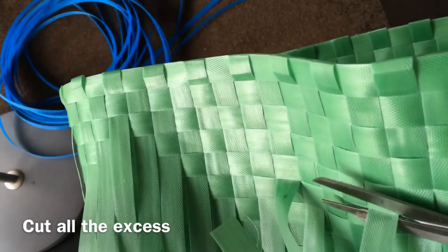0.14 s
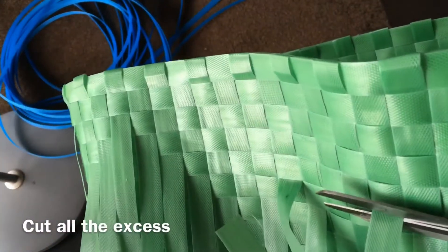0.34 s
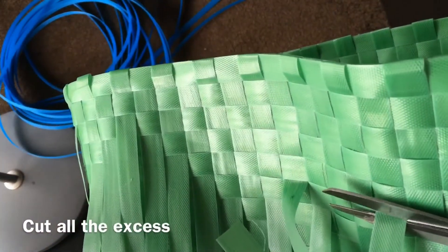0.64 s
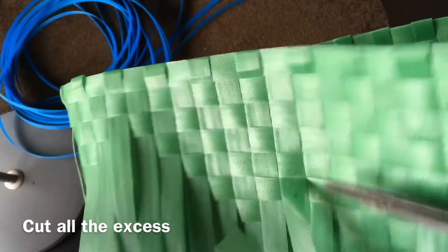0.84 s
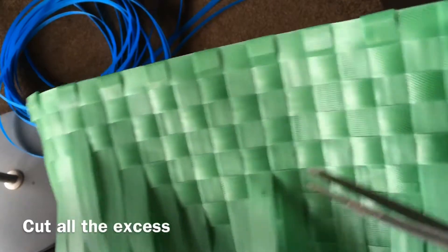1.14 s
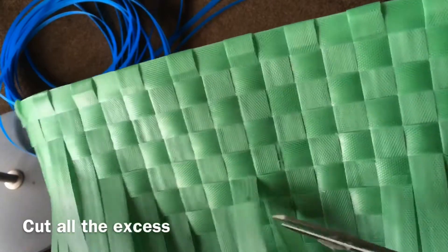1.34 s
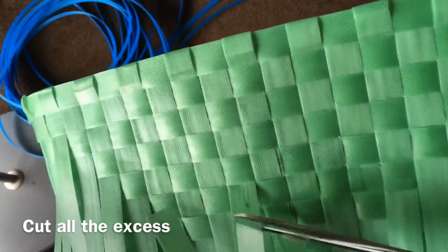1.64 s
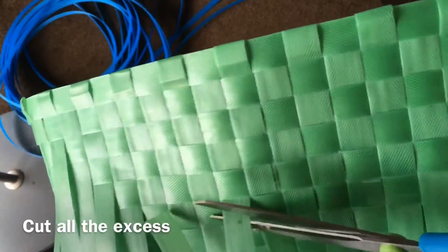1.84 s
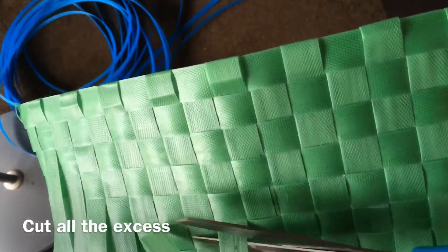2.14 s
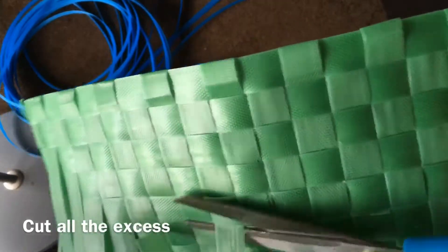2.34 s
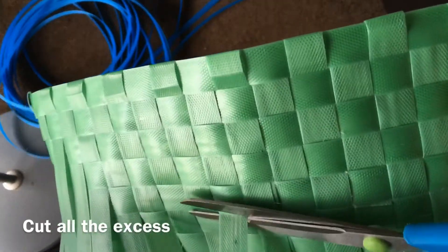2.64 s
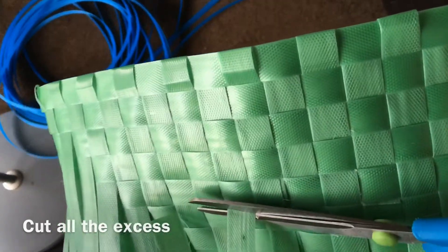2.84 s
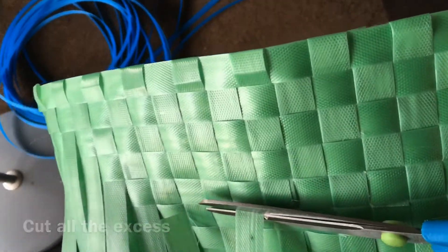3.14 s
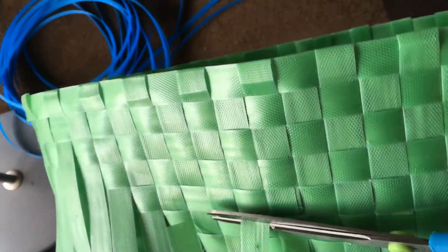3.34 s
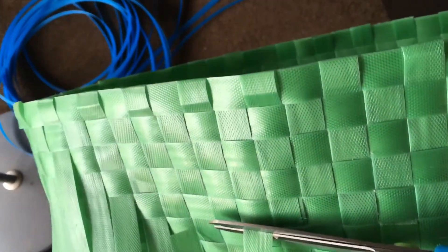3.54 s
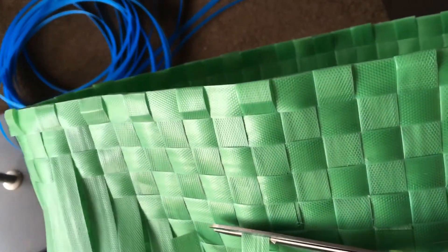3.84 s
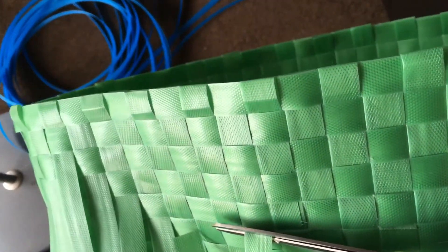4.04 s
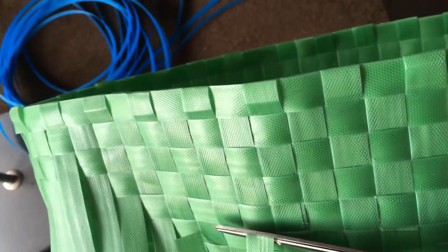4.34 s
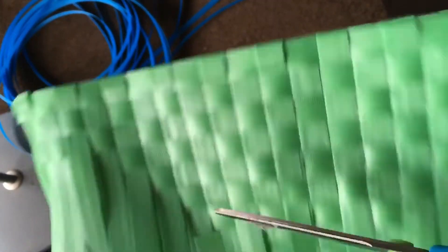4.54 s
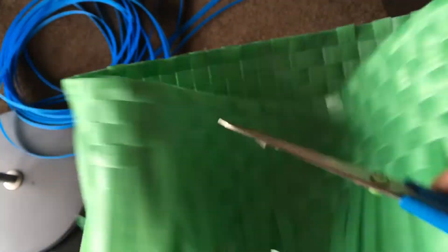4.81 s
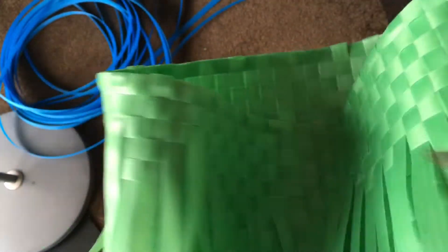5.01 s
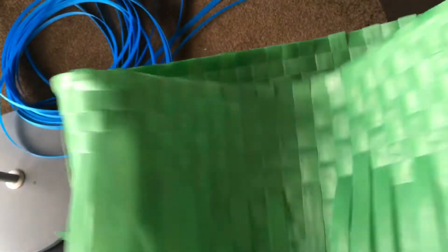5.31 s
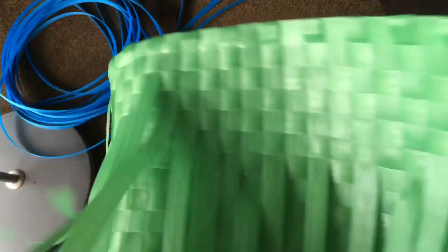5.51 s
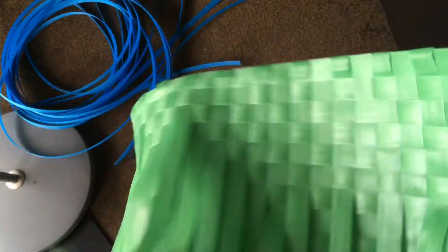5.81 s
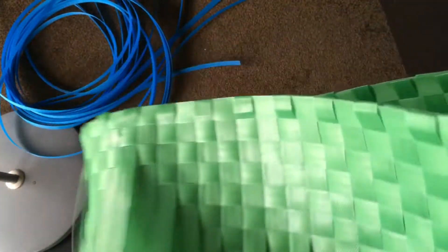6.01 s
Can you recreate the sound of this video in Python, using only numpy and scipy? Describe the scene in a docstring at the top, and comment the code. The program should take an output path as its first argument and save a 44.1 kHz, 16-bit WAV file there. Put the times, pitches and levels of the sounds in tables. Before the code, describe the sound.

After a near-silent start, a burst of bright cracks splits a tough plastic strip and the blades shut. Light scuffs and soft knocks of loose strips follow, then a second pair of hard snips, tiny ticks, and one last loud snap. The stiff woven bag then rustles and clatters as it is flipped. Close microphone, short indoor reverberation, faint bass rumble.

```python
"""Scissors trim the stiff plastic strapping of a woven bag, close by in a small room.
In three bouts of cutting, strips split in runs of cracks: noise bursts through steel resonances, plus ringing
bending modes. The steel blades clack shut as short damped modes. Between cuts loose strips slide (filtered
grains) and tap (scuff and ring); at the end the bag is turned over and rustles. A low rumble lies beneath."""
import sys
import numpy as np
from scipy import signal
from scipy.fft import rfft, irfft
from scipy.io import wavfile

SR = 44100
rng = np.random.default_rng(int(sys.argv[2]) if len(sys.argv) > 2 else 0)


def inscribe(sig):
    """Save sig as 16-bit PCM at rate SR to the path in sys.argv[1].

    A 1-D sig is mono; a 2-D sig holds one channel per row.
    Samples are clipped to [-1, 1] before scaling.
    """
    pcm = np.round(np.clip(np.atleast_2d(sig).T, -1, 1) * 32767)
    wavfile.write(sys.argv[1], SR, pcm.astype(np.int16))


N = 272097
TIME = np.arange(N) / SR
CUTOFF_HZ = 16100


def from_db(db):
    """Decibels to amplitude gain."""
    return 10 ** (np.asarray(db) / 20)


def rms_one(x):
    """Scale to rms 1."""
    return x / np.sqrt(np.mean(x ** 2) + 1e-20)


def at_hz(points, hz):
    """Interpolate a table on a log-frequency axis."""
    known_hz, values = np.transpose(points)
    return np.interp(np.log(np.maximum(hz, 1)), np.log(known_hz), values)


def add(out, start_s, sound):
    """Mix a sound in at start_s."""
    start = int(start_s * SR)
    out[start:start + len(sound)] += sound[:N - start]


def coloured(x, spectrum, size=4096):
    """Causal minimum-phase filter with the given spectrum and unit power gain."""
    gain = from_db(at_hz(spectrum, np.fft.rfftfreq(size, 1 / SR)))
    cepstrum = irfft(np.log(gain))
    # fold the cepstrum onto positive time: minimum phase
    cepstrum[1:size // 2] *= 2
    cepstrum[size // 2 + 1:] = 0
    response = irfft(np.exp(rfft(cepstrum)))
    return signal.fftconvolve(x, response / np.linalg.norm(response))[:len(x)]


def drift(knots_per_s):
    """Smooth random wander of rms 1."""
    knots = rng.standard_normal(N // 20)
    return rms_one(np.interp(TIME * knots_per_s, np.arange(len(knots)), knots))


def ring(hz, t60_s, delay_s=0, size=8192):
    """One struck mode: a sine under an exponential decay from height 1."""
    t = np.maximum(TIME[:size] - delay_s, 0)
    return np.sin(2 * np.pi * hz * t) * from_db(-60 * t / t60_s)


def resonate(x, resonances):
    """A sound together with the resonances that it stirs up."""
    out = x
    for hz, width_hz, db in resonances:
        b, a = signal.iirpeak(hz, hz / width_hz, fs=SR)
        out = out + from_db(db) * signal.lfilter(b, a, x)
    return out


def tinted(burst, tint_db, quality, count=3):
    """Each contact catches a few short lengths of strip that lend it a colour of their own; energy kept."""
    pitches_hz = np.exp(rng.uniform(np.log(1500), np.log(12000), count))
    out = resonate(burst, [(hz, hz / quality, tint_db) for hz in pitches_hz])
    return out * np.linalg.norm(burst) / np.linalg.norm(out)


def fracture(snap_s, tear_s, tear_db, size=1024):
    """A sudden break, then a few milliseconds of tearing fibres; rms 1 over a millisecond."""
    t = TIME[:size]
    envelope = np.exp(-t / snap_s) + from_db(tear_db) * np.exp(-t / tear_s)
    burst = rng.standard_normal(size) * envelope
    burst[0] += 4.0
    return burst * np.sqrt(SR / 1000) / np.linalg.norm(burst)


def grains(per_s, spread_db):
    """Random tiny slips of uneven size and either sign."""
    sizes = from_db(spread_db * np.minimum(rng.exponential(1, N), 4))
    signs = rng.choice([-1, 1], N)
    return sizes * signs * (rng.random(N) < per_s / SR)


def crinkles(per_s, spread_db, cycles, low_hz, high_hz, count=22):
    """Slips ring short stretches of strip at log-spaced pitches, weighted for a flat spectrum; rms 1."""
    out = 0
    for hz in np.geomspace(low_hz, high_hz, count):
        clicks = grains(per_s / count * (hz / 1000) ** .3, spread_db)
        ringing = signal.oaconvolve(clicks, ring(hz, cycles / hz))[:N]
        out = out + np.sqrt(hz) * rms_one(ringing)
    return rms_one(out)


# bending modes of a strip. Each row: multiple of its pitch, relative level in dB, t60 in cycles at damping 1
STRIP_MODES = [(.22, -19, 5.9), (.4, -7.5, 4.7), (.72, -7, 4.4), (1, 2.5, 7.3), (1.3, -1, 2.6),
               (1.8, -2.5, 7.2), (2.6, -7, 21), (3.7, -11, 7.1), (5.4, -22, 4.6), (7.6, -20.5, 7.9)]
BEND_DELAY_S = 0.00064  # at 1 kHz, longer below


def strip_ring(pitch_hz, damping, spread_db, detune):
    """A strip flexes in its bending modes, which disperse so that the low ones arrive last; peak 1."""
    out = 0
    for k, (ratio, db, cycles) in enumerate(STRIP_MODES):
        stretch = np.exp(detune * rng.normal() * np.log(ratio))
        hz = min(pitch_hz * ratio * stretch, CUTOFF_HZ)
        t60_s = cycles / (hz * damping)
        delay_s = BEND_DELAY_S * np.sqrt(1000 / hz)
        # the faster-decaying copy makes the mode swell in
        swing = ring(hz, t60_s, delay_s) - ring(hz, t60_s * .13, delay_s)
        out = out + (-1) ** k * from_db(db + spread_db * rng.normal()) * swing
    return out / np.abs(out).max()


# spectrum of the rumble. Each row: frequency in Hz, relative density in dB per Hz
FLOOR_COLOUR = [(15, -50), (25, -8.5), (70, 0), (111, -0.5), (161, -4.5), (217, -4.5), (476, -22),
                (988, -26.5), (1700, -31), (3430, -36), (7710, -41), (9320, -37.5), (13200, -45),
                (16000, -48)]
FLOOR_DB = -59


def room_floor():
    """The low rumble of the room: steady noise, mostly bass."""
    return from_db(FLOOR_DB) * rms_one(coloured(rng.standard_normal(N), FLOOR_COLOUR))


# spectrum of the reverberation. Each row: frequency in Hz, relative level in dB
ROOM_COLOUR = [(60, 3), (200, 3.5), (450, 1.5), (1000, -2.5), (2200, 1.5), (4500, -2.5), (7700, -4),
               (12000, -3), (16000, -8)]
# decay of the room. Each row: frequency in Hz, t60 in s
ROOM_T60 = [(150, 0.38), (1500, 0.35), (8000, 0.3), (16000, 0.19)]


def room(x, wet_db, build_s, count=14):
    """Echoes from all sides merge into a smooth wash: each band stores the sound's power and lets it die."""
    out, edges_hz = 0, np.geomspace(60, 14500, count)
    swell = np.exp(-1 / (build_s * SR))
    for low_hz, high_hz in zip(edges_hz, edges_hz[1:]):
        band = signal.butter(2, [low_hz, high_hz], "band", fs=SR, output="sos")
        hz = np.sqrt(low_hz * high_hz)
        keep = from_db(-120 / (at_hz(ROOM_T60, hz) * SR))  # acts on power, hence 120
        sound = signal.sosfilt(band, x + 1e-9 * rng.standard_normal(N))
        stored = signal.lfilter([1 - keep], [1, -keep], sound ** 2)
        power = signal.lfilter([1 - swell], [1, -swell], stored)
        wash = rms_one(signal.sosfilt(band, rng.standard_normal(N)))
        out = out + from_db(wet_db + at_hz(ROOM_COLOUR, hz)) * np.sqrt(power) * wash
    return out


# first echoes off the bag and the table. Each row: delay in s, level in dB
NEAR_ECHOES = [(.0013, -26), (.0031, -19)]


def near_echoes(x):
    """Close surfaces answer within milliseconds, thickening each click."""
    out = x
    for delay_s, db in NEAR_ECHOES:
        delayed = np.concatenate([np.zeros(int(delay_s * SR)), x])[:N]
        out = out + from_db(db) * delayed
    return out


# the woven wall springs back or is nudged. Each row: start in s, relative level in dB, pitch in Hz
THUMPS = [(.081, -31, 199), (0.837, -27.5, 144.7), (1.811, -34, 124), (2.147, -33.5, 109),
          (2.349, -31.5, 155.4), (3.308, -25, 169), (4.551, -21.5, 188), (5.446, -28, 166)]


def bag_wall():
    """The wide woven wall gives a short dull thump: one low damped mode."""
    out = np.zeros(N)
    for start_s, db, hz in THUMPS:
        add(out, start_s, from_db(db) * ring(hz, t60_s=0.048))
    return out


# the bag is turned over. Each row: time in s, relative flexing of the weave in dB,
# relative sliding of strip on strip in dB
TURNING = [(4.98, -58, -73), (5.028, -51, -47.5), (5.194, -46, -55), (5.35, -42.5, -57), (5.456, -39, -47),
           (5.566, -44.5, -48.5), (5.646, -40.5, -48.5), (5.828, -47, -55.5), (5.966, -46, -61.5),
           (6.17, -47.5, -55.5)]
TURN_FLEX_DB, TURN_SLIDE_DB = 2.5, 3  # added to the rows above
# the hand pushes the strips along. Each row: start in s, time to release in s,
# relative flexing of the weave in dB, relative sliding of strip on strip in dB
STROKES = [(0.221, 0.14, -61, -96), (1.057, 0.24, -61, -58.5), (1.344, 0.071, -53, -56.5),
           (1.443, 0.11, -66, -71), (1.572, 0.15, -57.5, -61.5), (1.73, 0.13, -53.5, -63),
           (1.98, 0.091, -53.5, -62.5), (2.128, 0.15, -56, -64), (2.303, 0.14, -53, -61.5),
           (2.543, 0.13, -57, -79), (4.658, 0.15, -48, -67.5), (4.786, 0.089, -44, -49.5),
           (4.877, 0.079, -34.5, -40), (5.421, 0.056, -36.5, -51)]
STROKE_ATTACK_S, STROKE_RELEASE_S = 0.023, 0.0324


def handling():
    """How hard the weave flexes and the strips slide, as gains: short strokes plus the long turn."""
    turn_s, flexing_db, sliding_db = np.transpose(TURNING)
    flex = np.interp(TIME, turn_s, from_db(flexing_db + TURN_FLEX_DB), left=0)
    slide = np.interp(TIME, turn_s, from_db(sliding_db + TURN_SLIDE_DB), left=0)
    for start_s, length_s, flexing_db, sliding_db in STROKES:
        attack = np.clip((TIME - start_s) / STROKE_ATTACK_S, 0, 1)
        release = np.clip(1 - (TIME - start_s - length_s) / STROKE_RELEASE_S, 0, 1)
        flex = flex + from_db(flexing_db) * attack * release
        slide = slide + from_db(sliding_db) * attack * release
    return flex, slide


# spectra of flexing and of sliding. Each row: frequency in Hz, relative density in dB per Hz
WEAVE_COLOUR = [(50, -11.5), (130, 9.5), (300, 6.5), (800, 4.5), (1500, -0.5), (2500, -12.5), (4500, -32.5),
                (9000, -28), (16000, -12)]
SLIDE_COLOUR = [(200, -17), (1000, 8), (2500, 1), (5000, -2.5), (8000, -5.5), (12000, -5.5), (15500, -15.5)]  # also colours the scuffs of taps


def rustle(flex, slide):
    """The weave crinkles in clumped slips while ribbed strips slide with a fine gritty hiss."""
    creaks = crinkles(per_s=900, spread_db=3.5, cycles=12.8, low_hz=59.3, high_hz=5320)
    creaks = creaks * from_db(2 * drift(knots_per_s=45))
    hiss = rms_one(grains(per_s=6000, spread_db=-2.5))
    # edges catch and let go with tiny high ticks
    catches = crinkles(per_s=900, spread_db=4, cycles=32, low_hz=1300, high_hz=14500, count=34)
    grit = (hiss + 1.2 * catches) * from_db(2.2 * drift(knots_per_s=60))
    weave = from_db(-2.5) * flex * rms_one(coloured(creaks, WEAVE_COLOUR))
    sliding = from_db(-0.5) * slide * rms_one(coloured(grit, SLIDE_COLOUR))
    return weave + sliding


STRAY_PEAK_DB, STRAY_EDGE_DB = 8.5, 5.5  # knock above the flexing, scuff above the sliding
STRAY_SCATTER_DB = 0.5
STRAY_LOW_HZ, STRAY_HIGH_HZ = 505, 1314


def stray_taps(flex, slide, count=90):
    """Chance taps, as strong as the handling at that moment: rows like those of TAPS."""
    moments, pitches = rng.random((count, 2)).T
    scatters_db = STRAY_SCATTER_DB * np.clip(rng.standard_normal((count, 2)), -2, 2)
    rows = []
    for i, pitch, (peak_db, edge_db) in zip((moments * N).astype(int), pitches, scatters_db):
        if flex[i] > 0:
            pitch_hz = STRAY_LOW_HZ * (STRAY_HIGH_HZ / STRAY_LOW_HZ) ** pitch
            knock_db = 20 * np.log10(flex[i]) + STRAY_PEAK_DB + peak_db
            scuff_db = 20 * np.log10(slide[i]) + STRAY_EDGE_DB + edge_db
            rows.append((i / SR, knock_db, pitch_hz, scuff_db))
    return rows


# the clearest taps of loose strips on each other. Each row: start in s, relative knock peak in dB,
# pitch in Hz, relative level of the treble edge in dB
TAPS = [(0.256, -36, 406, -85), (0.312, -38, 404, -82), (0.348, -41, 400, -81), (0.442, -41, 397, -64),
        (1.176, -33, 534, -49), (1.238, -56, 616, -54), (1.353, -35, 597, -53), (1.398, -28.5, 399, -48.5),
        (1.585, -27, 1676, -52), (1.746, -37, 390, -54), (1.804, -30.5, 800, -55), (1.849, -55, 620, -48),
        (1.936, -33, 558, -52), (2.061, -40, 417, -64), (2.256, -35, 374, -49), (2.577, -28.5, 389.7, -67),
        (2.623, -39.5, 382, -74.5), (2.662, -31, 380, -67.5), (2.801, -31, 384.5, -89),
        (4.68, -28, 2200, -53), (4.71, -38, 900, -55), (4.732, -34.5, 826, -48.5), (4.812, -23, 1690, -28),
        (4.828, -14, 1190, -60), (4.884, -18, 1036, -40), (5.161, -22, 907, -64), (5.24, -40, 417, -36.5),
        (5.254, -22, 375, -60), (5.329, -22.5, 656, -46), (5.401, -17, 688, -54), (5.435, -22, 360, -32.5),
        (5.513, -18.5, 1490, -36), (5.59, -18, 930, -56), (5.631, -19.5, 940, -41),
        (5.719, -22, 610, -28.5), (5.944, -31, 930, -56), (6.085, -23, 527, -49.5),
        (6.136, -23.5, 1270, -59)]


def taps(rows, scuff_s, size=2048):
    """Free strip ends flick against the weave: a short dry scuff, and the strip rings."""
    scuffs, knocks = np.zeros(N), np.zeros(N)
    for start_s, peak_db, pitch_hz, edge_db in rows:
        scuff = rng.standard_normal(size) * np.exp(-TIME[:size] / scuff_s)
        add(scuffs, start_s, from_db(edge_db) * tinted(scuff, tint_db=7, quality=12))
        knock = strip_ring(pitch_hz, damping=0.35, spread_db=4, detune=0.178)
        add(knocks, start_s, from_db(peak_db) * knock)
    return from_db(1.5) * coloured(scuffs, SLIDE_COLOUR) + from_db(-5.5) * knocks


# the blades tick as they shift on the strip. Each row: start in s, relative level in dB
BLADE_TICKS = [(0.67, -52.5), (1.353, -44), (2.803, -42.5), (3.489, -60), (3.5795, -54), (3.68, -60),
               (3.862, -59), (4.04, -61.5), (4.288, -53.5)]
# spectrum of the ticks. Each row: frequency in Hz, relative density in dB per Hz
TICK_COLOUR = [(200, -8), (1200, 10.5), (2800, 8.5), (5000, -3.5), (9000, -12), (15500, -12)]
# the steel colours ticks and cracks. Each row: frequency in Hz, width in Hz, level in dB
STEEL_RESONANCES = [(1954, 140, -3), (4040, 160, -1.5), (4930, 150, -0.5), (6350, 79, 0), (6600, 170, 2.5),
                    (8590, 260, -13.5)]


def blade_ticks():
    """Small dull ticks of steel on plastic as the scissors find their place: bursts through the steel."""
    out = np.zeros(N)
    for start_s, db in BLADE_TICKS:
        add(out, start_s, from_db(db) * fracture(snap_s=0.0004, tear_s=0.0031, tear_db=1))
    return resonate(coloured(out, TICK_COLOUR), STEEL_RESONANCES)


# the blades clack together. Each row: start in s, relative level in dB,
# pitch ratio set by where along the edge they meet
CLACKS = [(0.8854, 4.5, 1.0), (3.223, -9.5, 0.71), (3.2996, -6, 0.58), (4.5498, 3.5, 0.99)]
# steel blades. Each row: frequency in Hz at pitch ratio 1, relative level in dB, t60 in s
BLADE_MODES = [(2550, -25, 0.01), (7870, -8, 0.0046), (8600, -17.5, 0.012), (10640, -10, 0.0019)]


def blades():
    """The blades meet as the strip gives way; the hand damps their modes at once."""
    out = np.zeros(N)
    for start_s, level_db, pitch in CLACKS:
        for hz, db, t60_s in BLADE_MODES:
            add(out, start_s, from_db(level_db + db) * ring(pitch * hz, t60_s))
    return out


# the strip splits between the blades. Each row: start in s, ribs that part, relative crack level in dB,
# relative flex level in dB, pitch at the first rib in Hz
CRACKS = [(0.0799, 1, -47.5, -34.5, 1730), (0.7085, 2, -40.5, -34, 365), (0.7139, 1, -40, -32.5, 368),
          (0.7481, 1, -33, -28, 460), (0.7512, 6, -21, -26, 447), (0.794, 1, -27.5, -27.5, 370),
          (0.8282, 1, -42, -41, 493), (0.8365, 2, -27, -21.5, 667), (0.8825, 2, -19, -28.5, 720),
          (3.0813, 1, -50, -40.5, 1632), (3.0958, 1, -46, -35, 1700), (3.1038, 1, -44, -30.5, 1290),
          (3.1429, 1, -46.5, -31.5, 1560), (3.1734, 1, -51, -43.5, 1550), (3.1969, 2, -35, -28, 1380),
          (3.2228, 1, -14.5, -21, 556), (3.3002, 3, -18.5, -20.5, 1500), (3.6386, 2, -38, -26.5, 484),
          (3.7343, 2, -41, -37, 726), (3.812, 2, -55.5, -34.5, 1420), (4.4165, 1, -38, -35.5, 1202),
          (4.425, 2, -31, -26, 770), (4.5313, 1, -34.5, -56, 1490), (4.5475, 2, -13.5, -27.5, 507)]
# ribs part one after another, a little weaker each on average, with chance differences in strength
RIB_GAP_S, RIB_LOSS_DB, RIB_SCATTER_DB = 0.0024, 0.72, 4.2
# the freed tongue lengthens: its pitch nears that of a loose strip, keeping this share of the gap per rib
LOOSE_STRIP_HZ, PITCH_GAP_KEPT = 362, 0.25


def ribs():
    """Unroll every split into its run of parting ribs: start s, crack dB, flex dB, pitch Hz."""
    for start_s, count, crack_db, flex_db, first_hz in CRACKS:
        for k in range(int(round(count))):
            change_db = RIB_SCATTER_DB * rng.normal() * (k > 0) - RIB_LOSS_DB * k
            pitch_hz = LOOSE_STRIP_HZ + (first_hz - LOOSE_STRIP_HZ) * PITCH_GAP_KEPT ** k
            yield start_s + k * RIB_GAP_S, crack_db + change_db, flex_db + change_db, pitch_hz


# spectrum of the snaps. Each row: frequency in Hz, relative density in dB per Hz
CRACK_COLOUR = [(100, -8), (500, 0), (1500, -2.5), (3300, -5), (5200, -6), (8000, -4), (11500, 0.5),
                (14000, -4.5), (16500, -23)]


def cuts():
    """Each crack is a bright snap through the steel and a hollow knock of the released strip."""
    snaps, knocks = np.zeros(N), np.zeros(N)
    for start_s, crack_db, flex_db, pitch_hz in ribs():
        snap = tinted(fracture(snap_s=0.0001, tear_s=0.0043, tear_db=-7.0), tint_db=-3.0, quality=14)
        knock = strip_ring(pitch_hz, damping=0.87, spread_db=5, detune=0.2)
        add(snaps, start_s, from_db(crack_db) * snap)
        add(knocks, start_s, from_db(flex_db) * knock)
    steely = resonate(coloured(snaps, CRACK_COLOUR), STEEL_RESONANCES)
    return from_db(-1.0) * steely + from_db(2.0) * knocks


# the hollow of the bag. Each row: frequency in Hz, width in Hz, level in dB
BAG_RESONANCES = [(343, 72, -8), (697, 51, -14)]


def scene():
    """Scissors and bag near the microphone, over the low rumble of the room."""
    flex, slide = handling()
    scissors = cuts() + blades() + blade_ticks()
    bag = bag_wall() + rustle(flex, slide)
    bag = bag + taps(list(TAPS) + stray_taps(flex, slide), scuff_s=0.0069)
    near = near_echoes(resonate(scissors + bag, BAG_RESONANCES))
    # thin strips radiate little bass
    near = signal.sosfilt(signal.butter(2, 60, "high", fs=SR, output="sos"), near)
    rumble = room_floor()
    return (near + room(near, wet_db=-15, build_s=0.001) + rumble)[None]


def record(dry):
    """The microphone sheds the deep bass, clips the highest peaks, and the top is cut."""
    lean = signal.sosfilt(signal.butter(4, 40, "high", fs=SR, output="sos"), dry)
    held = np.clip(lean, -.76, .76)
    return signal.sosfilt(signal.ellip(8, .3, 70, CUTOFF_HZ, fs=SR, output="sos"), held)


dry = scene()
out = record(dry)
inscribe(out)
```